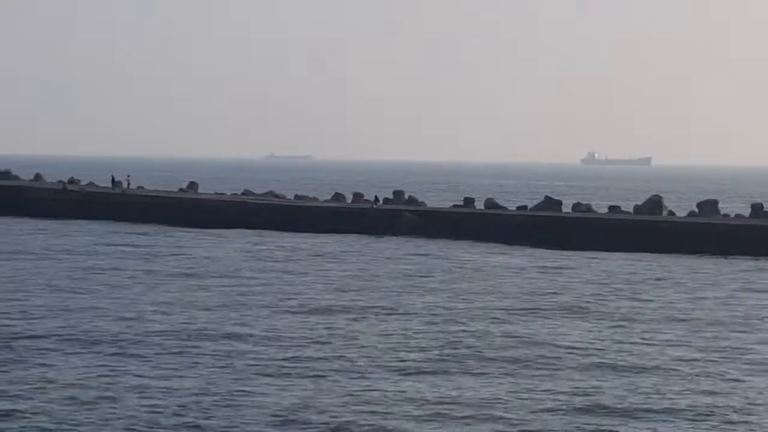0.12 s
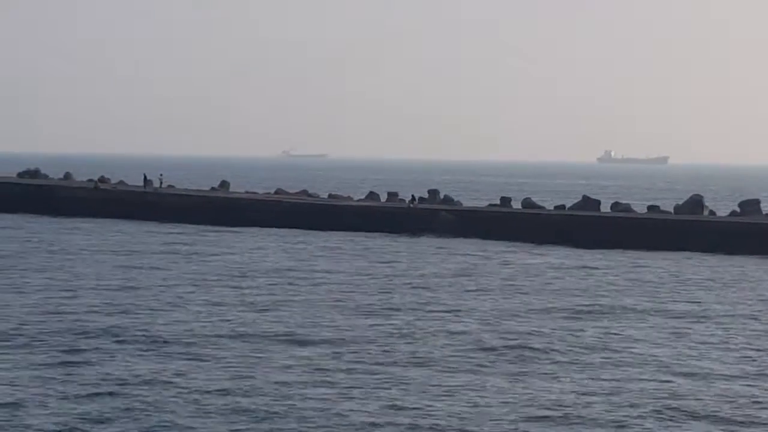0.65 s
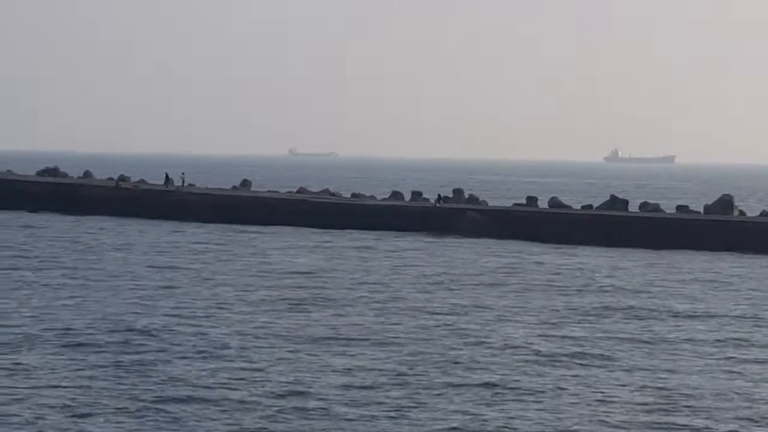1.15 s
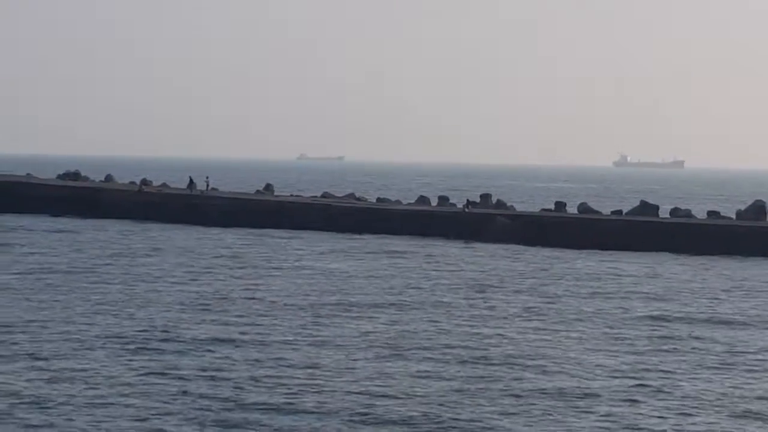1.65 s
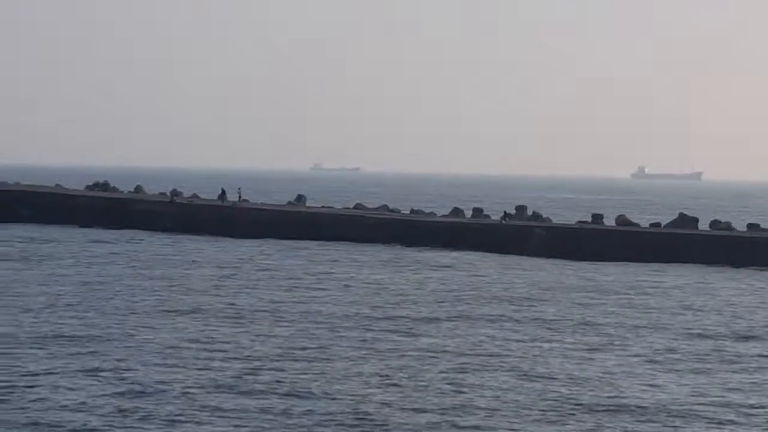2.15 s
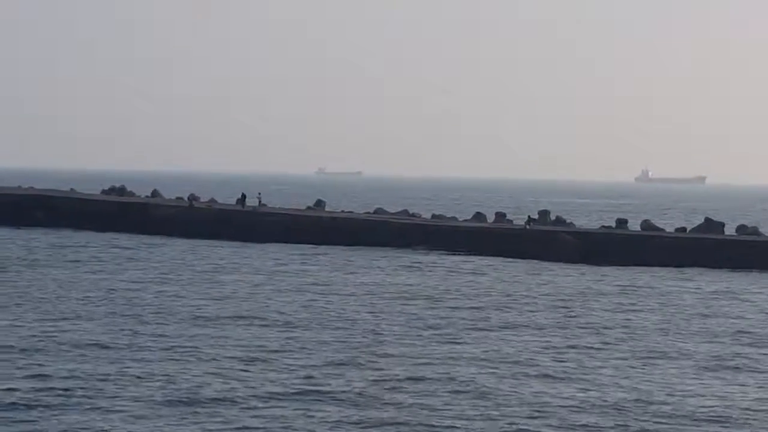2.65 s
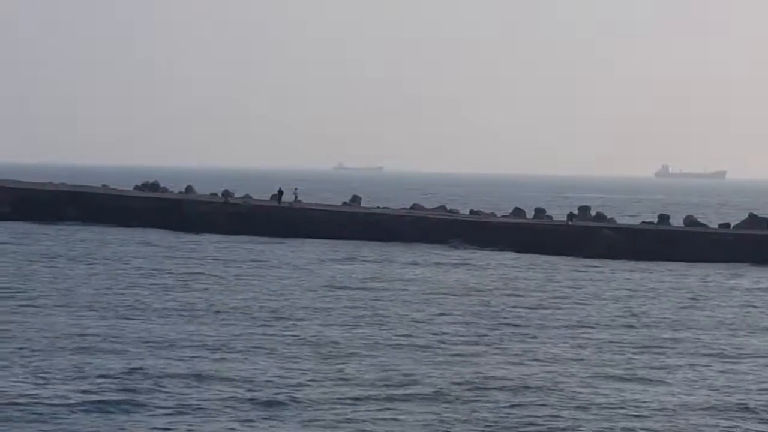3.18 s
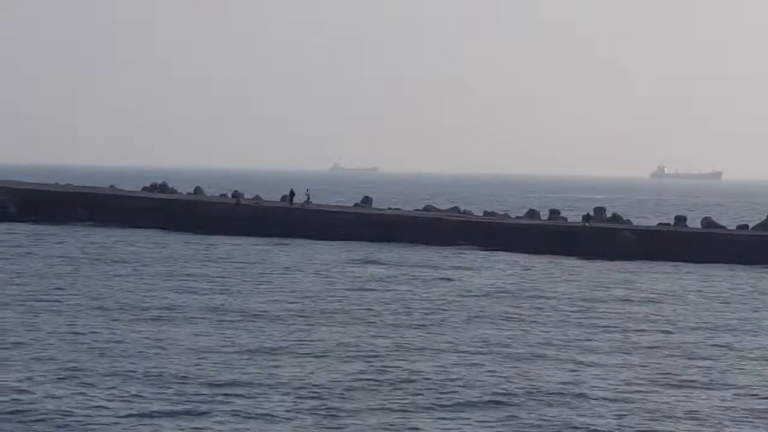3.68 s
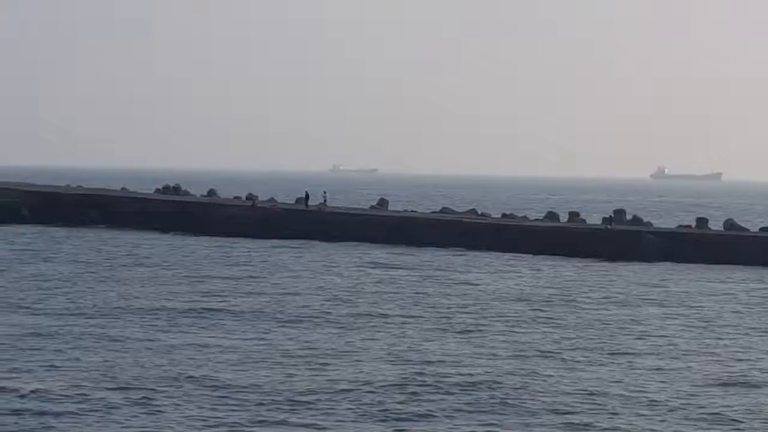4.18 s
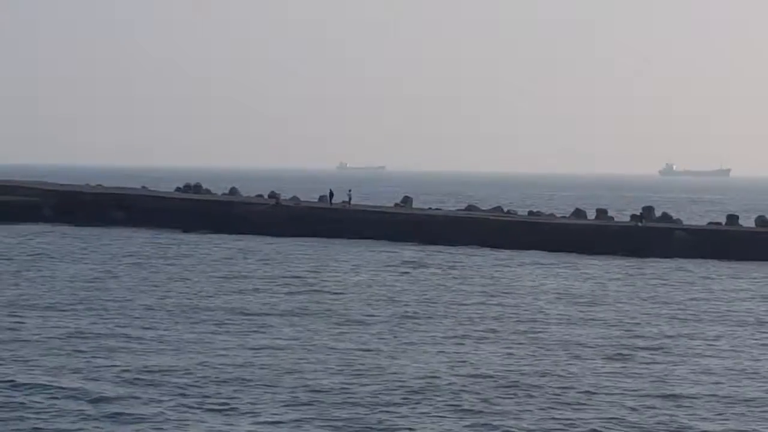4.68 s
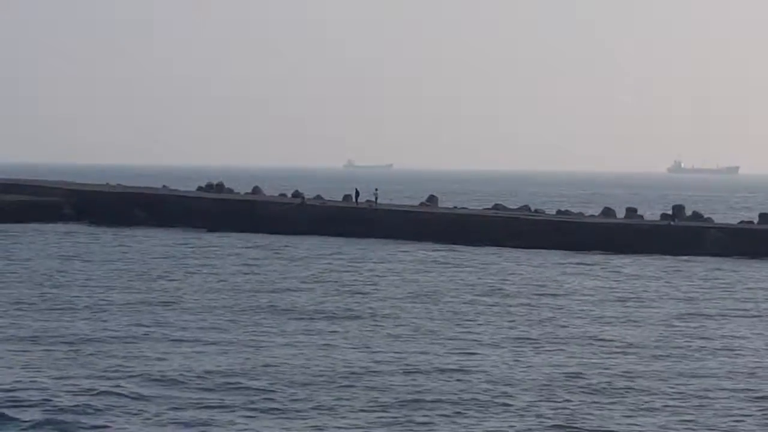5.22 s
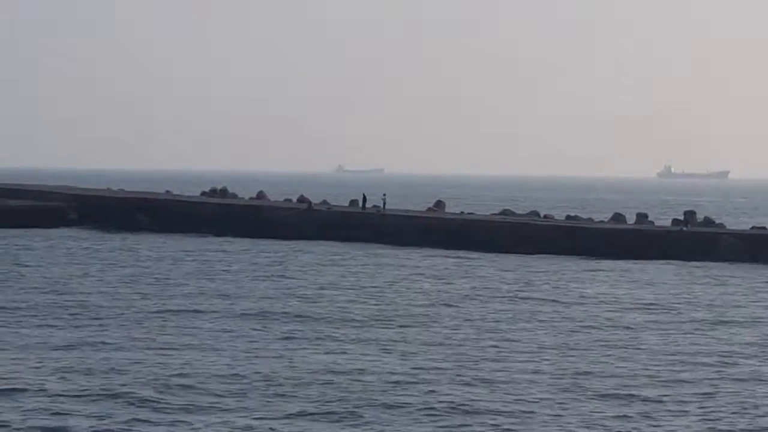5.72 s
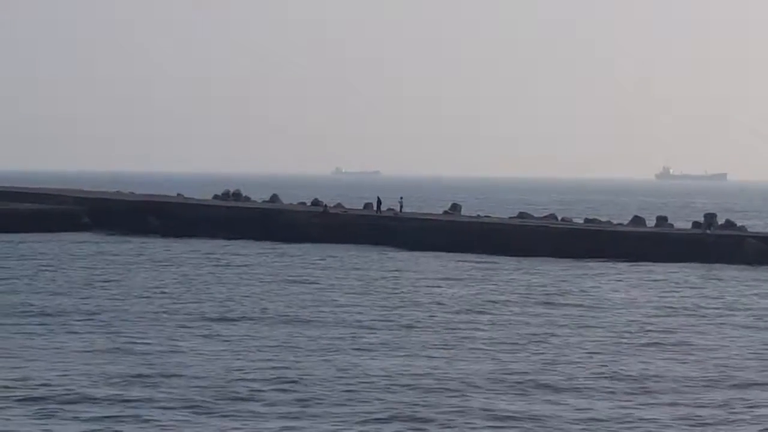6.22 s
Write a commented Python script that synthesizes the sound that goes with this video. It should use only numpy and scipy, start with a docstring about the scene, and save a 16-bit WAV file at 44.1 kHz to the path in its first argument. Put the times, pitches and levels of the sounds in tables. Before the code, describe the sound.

A continuous, bass-heavy ship's engine dominates, pulsing quickly and evenly without changing speed. Steady thin machine tones and a dull airy rush lie over it, while a low hum comes and goes in short swells. Quiet water hiss brightens slightly in a few grainy splashes near five and a half seconds. Open deck outdoors, heard from on board; bass centred, hiss spread wide.

```python
"""A low, even drone fills the deck of a ship under way: a diesel at governed speed, a sum of sines at its orders.
Fan, gear and lone sines add steady tones; hull and exhaust roar as shaped noise, its upper part puffing
with the engine. A narrow low hum near 160 Hz, resonant noise and a sine, swells by chance. The wash hisses
in bands of noise with bursts of spray, and a thin high hiss, a narrow band of noise, swells and fades."""
import sys
import numpy as np
from scipy import signal
from scipy.fft import rfft, irfft
from scipy.io import wavfile
from scipy.ndimage import uniform_filter1d

SR = 44100
rng = np.random.default_rng(int(sys.argv[2]) if len(sys.argv) > 2 else 0)


def undo_db(level):
    """Turn decibels back into plain size, where 20 dB means ten times bigger."""
    steps = np.asarray(level, float) / 20
    return 10 ** steps


def generate_wav(signal):
    """Clip the signal to [-1, 1] and save it as 16-bit WAV at the path in sys.argv[1]."""
    frames = np.transpose(np.atleast_2d(signal))
    scaled = np.clip(frames, -1, 1) * 32767
    pcm = np.round(scaled).astype(np.int16)
    wavfile.write(sys.argv[1], SR, pcm)


N = 279594
T = np.arange(N) / SR  # time in s
HZ = np.arange(N // 2 + 1) * SR / N  # frequencies of the spectrum
ENGINE_HZ, FAN_HZ, GEAR_HZ = 14.6956, 241.98, 508.15  # rotation rates; one engine turn is order 1

# engine orders with a level set one by one: order (multiple of ENGINE_HZ)
SET_ORDERS = [4, 5, 6, 7, 8, 9, 10, 11, 13, 14, 15, 17, 18, 20, 24, 29, 30, 32, 33, 36, 39, 42, 50, 51, 54,
              58, 59, 66, 72, 75, 104, 106, 111]
# mean rms level of each of these orders: left_db, right_db
SET_LEVELS = [(-36, -34), (-23, -24), (-23, -25), (-31, -33), (-31.5, -34.5), (-32, -30), (-33, -33),
              (-33, -33), (-36.5, -38), (-49.5, -42), (-27.5, -32), (-35, -35.5), (-32.5, -29.5),
              (-40, -38.5), (-40.5, -35), (-44.5, -40.5), (-40.5, -43), (-39.5, -41.5), (-43, -37.5),
              (-48, -40), (-48, -43.5), (-41, -44.5), (-49.5, -44), (-47, -43), (-54, -43), (-46.5, -52),
              (-44, -50), (-61, -49), (-54, -50), (-50.5, -47), (-60, -60), (-60, -60), (-57.5, -58.5)]


def engine(rule_db, slope_db_per_octave, scatter_db, blur_rad, spread_rad):
    """Fourier series of a periodic source: some orders are set one by one, the rest fall off and scatter."""
    orders = np.arange(4, 150)
    levels = rule_db + slope_db_per_octave * np.log2(orders[:, None] / 64)
    levels = levels + scatter_db * rng.standard_normal((len(orders), 2))
    levels[np.isin(orders, SET_ORDERS)] = SET_LEVELS
    # odd orders stand a quarter cycle apart from even ones, so the low drone beats twice a turn
    starts = np.pi / 2 * (orders % 2)
    # the hull spreads the orders in time and scrambles the higher ones
    starts = starts + spread_rad * orders ** 2 + blur_rad * orders * rng.standard_normal(len(orders))
    return tones(ENGINE_HZ, orders, levels, starts, wobble_s=.00008, flutter_db=.9, skew_rad=.35)


# fan, multiples 2 to 6 of FAN_HZ: left_db, right_db, left_lead_rad
FAN_LEVELS = [(-45, -46.5, 1.6), (-36.5, -49, 2.43), (-42, -41.5, 1.9), (-57.5, -62, 0.3), (-61, -58, 1)]
# gear, multiples 1 to 3 of GEAR_HZ: left_db, right_db, left_lead_rad
GEAR_LEVELS = [(-37, -43, 0.75), (-42.5, -50, 0.49), (-65, -68, -.4)]
# lone steady tones: pitch_hz
LONE_PITCHES = [99.65, 312.7, 387.7, 578, 653.3, 701.7, 846.4, 1410.7]
# level of each lone tone: left_db, right_db, left_lead_rad
LONE_LEVELS = [(-26.5, -26.5, -0.19), (-39.5, -42.5, 0.12), (-46.5, -45, 0.34), (-46, -45, 0.47),
               (-46, -47, 0.84), (-50, -43.5, 0.54), (-49.5, -48, 1.6), (-55.5, -52.5, -1.1)]


def machinery():
    """Harmonic series of a fan and a gear beside lone tones, all starting in random phase."""
    starts = rng.uniform(0, 2 * np.pi, (3, len(LONE_LEVELS)))
    fan = tones(FAN_HZ, range(2, 7), FAN_LEVELS, starts[1], wobble_s=.00012, flutter_db=2.5)
    gear = tones(GEAR_HZ, range(1, 4), GEAR_LEVELS, starts[2], wobble_s=.00016, flutter_db=3)
    lone = tones(1, LONE_PITCHES, LONE_LEVELS, starts[0], wobble_s=.0001, flutter_db=1.7)
    return fan + gear + lone


# hull and exhaust, before the roll-off: frequency_hz, density_db_per_hz
HULL_ROAR = [(12, -85), (25, -64), (33, -58), (42, -48), (62, -48.5), (98, -40.5), (112, -42.5), (127, -46),
             (160, -44), (180, -46), (212, -45), (232, -49.5), (260, -47.5), (300, -50), (430, -52),
             (500, -58.5), (600, -55.5), (690, -59), (1000, -60)]
# air and exhaust rush, continuing upward: frequency_hz, density_db_per_hz
AIR_RUSH = [(1130, -61), (1210, -62.5), (1250, -65.5), (1350, -63.5), (1500, -67.5), (1650, -64.5),
            (1700, -68.5), (1800, -68.5), (2250, -70.5), (2450, -74), (3300, -78), (4300, -84), (5800, -89)]


def roar(split_hz, throb, rolloff_hz, swell_db):
    """Amplitude modulation: the upper roar puffs once and three times an engine turn and swells slowly."""
    spectrum = noise(over_hz(HULL_ROAR + AIR_RUSH)) / np.sqrt(1 + (HZ / rolloff_hz) ** 8)
    upper_share = 1 / (1 + (split_hz / (HZ + 1)) ** 4)
    lower = irfft(spectrum * (1 - upper_share), N)
    upper = irfft(spectrum * upper_share, N)
    turn = 2 * np.pi * ENGINE_HZ * T
    puff = 1 + throb * (np.cos(turn) + np.cos(3 * turn))
    return lower + upper * puff * undo_db(swell_db * walk(0.91))


# chance swells of a narrow low hum near 160 Hz: start_s (of the peak), length_s, level_db
HUM_SWELLS = [(0.09, 0.09, -22), (.82, .07, -24), (1.4, .08, -25), (1.68, 0.08, -23), (2.17, .06, -25),
              (2.77, .06, -24), (3.35, .07, -25), (3.77, 0.06, -21), (4.55, 0.14, -19.5), (5.0, .06, -22),
              (5.5, 0.12, -18.5), (5.79, 0.07, -21)]


def low_hum(hz, wander_hz, width_hz, hum_db):
    """Narrow-band resonance: noise through it hums in beads, and a sine of wandering frequency adds swells."""
    lead = np.exp(1j * np.array([[.15], [0]]))  # a little earlier on the left, in rad
    angle = 2 * np.pi * np.cumsum(hz + wander_hz * walk(12)) / SR
    shape, level_db = bumps(HUM_SWELLS)
    envelope = np.sqrt(2) * (shape * undo_db(level_db)).sum(axis=0)
    swells = envelope * (lead * np.exp(1j * angle)).real
    resonance = 1 / (1 + (2 * (HZ - hz) / width_hz) ** 2)
    hum = irfft(lead * rfft(rng.standard_normal(N)) * resonance, N)
    return swells + hum / hum.std() * undo_db(hum_db)


# water along the side, before the low cut: frequency_hz, density_db_per_hz
WASH_SPECTRUM = [(5800, -90), (8500, -91.5), (10000, -101.5), (12000, -102.5), (14500, -103.5),
                 (15500, -107)]
# spray bursts, rise in the lowest band before grain: start_s (of the peak), length_s, rise_db
SPRAY_BURSTS = [(1.22, .06, 2), (5.15, .1, 2.2), (5.33, 0.045, 4.5), (5.548, 0.052, 7.5)]


def wash(low_cut_hz, flicker_db, brighten, grain, drift_db):
    """Band-wise modulated noise: bands swell together, the top more, and flicker alone; spray is grainy."""
    shape, rise_db = bumps(SPRAY_BURSTS, tail=1.7)  # dies away 1.7 times slower than it rises
    burst_db = (shape * rise_db).sum(axis=0) * (1 + grain * walk(120))
    swell_db = burst_db + drift_db * walk(5.4)
    spectrum = noise(over_hz(WASH_SPECTRUM)) / np.sqrt(1 + (low_cut_hz / (HZ + 1)) ** 8)
    out = 0
    for k, centre_hz in enumerate(low_cut_hz * 2 ** np.arange(-.5, 2, .5)):
        # half-octave steps, each band a triangle on a log axis
        band = np.clip(1 - 2 * np.abs(np.log2((HZ + 1) / centre_hz)), 0, 1)
        level_db = (1 + brighten * k) * swell_db + flicker_db * walk(16)
        out = out + irfft(spectrum * band, N) * undo_db(level_db)
    return out


# thin high hiss, level before flicker: start_s, level_db
THIN_LEVEL = [(0.9, -82), (1.3, -78), (1.4, -66), (2.0, -66), (2.78, -61.5), (3.16, -63.5), (3.19, -73),
              (3.28, -62.5), (3.36, -71), (3.42, -64.5), (3.72, -71.5), (3.79, -65), (3.85, -76),
              (3.96, -67.5), (4.35, -81), (5.8, -83), (5.88, -72), (6.3, -71)]
# its spectral peaks, relative to each other: centre_hz, width_hz, level_db
THIN_SPECTRUM = [(12700, 300, 1), (13500, 2400, -7.5)]


def thin_hiss(flicker_db):
    """Narrow-band noise: resonance-shaped peaks high up, under a level that swells and fades."""
    shape = sum(undo_db(db) / (1 + (2 * (HZ - hz) / width) ** 2) for hz, width, db in THIN_SPECTRUM)
    hiss = irfft(noise(0) * shape, N)
    return hiss / hiss.std() * undo_db(curve(THIN_LEVEL) + flicker_db * walk(14))


def tones(base_hz, orders, levels, starts, wobble_s, flutter_db, skew_rad=0):
    """Phase locking: sines share one rotation, slightly early or late, and reach each channel by its own path."""
    step = 6  # the tones are low, so every sixth sample is enough
    turn = 2 * np.pi * base_hz * (T[::step] + wobble_s * walk(1.51, step))
    out = np.zeros((2, len(turn)))
    for k, start, (left_db, right_db, *lead) in zip(orders, starts, levels):
        # where paths interfere, level and phase part together between the channels
        parting = 1 + 0.28 * (left_db - right_db) * rng.standard_normal()
        lead = sum(lead) + skew_rad * min(k * base_hz / 300, 1) * parting
        angle = k * turn + start
        size = np.sqrt(2) * undo_db(flutter_db * walk(2.376, step))  # sqrt 2: levels are rms
        out += size * np.array([undo_db(left_db) * np.cos(angle + lead), undo_db(right_db) * np.cos(angle)])
    return signal.resample_poly(out, step, 1, axis=1)[:, :N]


# likeness of left and right: frequency_hz, likeness (0-1)
CHANNEL_LIKENESS = [(30, 0.92), (50, 0.97), (70, 0.85), (130, 0.96), (290, 1), (640, 0.71), (1410, 0),
                    (3100, 0), (15000, 0.03)]
# left level minus right level: frequency_hz, difference_db
CHANNEL_LEAN = [(60, -2), (110, -2), (200, -2.5), (380, 1.5), (700, 1), (1290, 2), (2380, 1), (4400, -3),
                (8120, -1.5), (15000, 1.5)]


def noise(db_per_hz):
    """Coherence: spectrum of two-channel noise, alike in the bass and unrelated in the treble."""
    like, lean_db = np.clip(over_hz(CHANNEL_LIKENESS), 0, 1), over_hz(CHANNEL_LEAN)
    mid, side = rfft(rng.standard_normal((2, N))) * np.sqrt(SR / 4) * undo_db(db_per_hz)
    mid, side = mid * np.sqrt(1 + like), side * np.sqrt(1 - like)
    return np.array([(mid + side) * undo_db(lean_db / 2), (mid - side) * undo_db(-lean_db / 2)])


def waver(x, share, rise_db):
    """Time-varying gain: one share of the spectrum swells and sinks slowly."""
    return x + irfft(rfft(x) * share, N) * (undo_db(rise_db) - 1)


def walk(rate, step=1):
    """Smoothed random modulation: levels held 1 / rate s and slewed twice; spread near 1."""
    hold, n = int(SR / step / rate), len(T[::step])
    held = np.repeat(rng.standard_normal(n // hold + 1), hold)
    return 1.264 * uniform_filter1d(uniform_filter1d(held, hold), hold)[:n]


def bumps(table, tail=1):
    """Gaussian envelopes: a swell for each row, shape (rows, N), and the rows' last column."""
    s, length, size = np.transpose(table)[:, :, None]
    length = length * np.where(T > s, tail, 1 / tail) ** .5
    return np.exp(-.5 * (2 * (T - s) / length) ** 2), size


def curve(table):
    """Linear interpolation in time: one value a sample."""
    return np.interp(T, *np.transpose(table))


def over_hz(table):
    """Interpolation over pitch: a value at every frequency, straight on a log axis."""
    hz, value = np.transpose(table)
    return np.interp(np.log(HZ + 1), np.log(hz), value)


# gain of the deepest rumble: start_s, gain_db
DEEP_GAIN = [(0, -4), (.6, -2), (1.4, 5.5), (2.0, 1.5), (2.9, -2.5), (3.6, 3), (4.7, 4.5), (5.4, 3),
             (6.34, -3.5)]
# gain of the hiss above the drone: start_s, gain_db
HISS_GAIN = [(0, 0), (1.6, -0.4), (2.25, 1), (2.7, 0.5), (3.6, 0), (4.4, 0), (5.1, 1), (5.8, -0.5),
             (6.34, 1)]


def scene():
    """Superposition of all the ship's sources, with slow gains on its deepest and its hissing parts."""
    drone = engine(rule_db=-60.0, slope_db_per_octave=-9.0, scatter_db=4.0, blur_rad=0.071, spread_rad=.12)
    drone = drone + machinery() + roar(split_hz=1200, throb=0.044, rolloff_hz=5450, swell_db=.25)
    deep_share = 1 / (1 + (HZ / 61.6) ** 8)
    hiss_share = 1 - 1 / (1 + (HZ / 3000) ** 8)
    ship = waver(drone, deep_share, curve(DEEP_GAIN))
    ship = ship + low_hum(hz=159.4, wander_hz=3.98, width_hz=18.5, hum_db=-29.0)
    ship = ship + wash(low_cut_hz=5340, flicker_db=1.2, brighten=0.09, grain=.25, drift_db=0.9)
    return waver(ship, hiss_share, curve(HISS_GAIN)) + thin_hiss(flicker_db=.7)


def band_limit(x):
    """A steep low-pass at the top of the band."""
    return signal.sosfilt(signal.butter(12, 15620, fs=SR, output="sos"), x)


def record(dry):
    """Soft saturation: a tanh curve rounds the highest peaks a little."""
    mix = np.tanh(0.6 * dry) / 0.6
    return band_limit(mix)


dry = scene()
out = record(dry)
generate_wav(out)
```